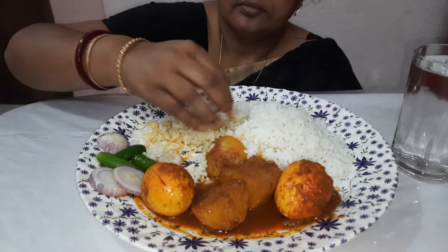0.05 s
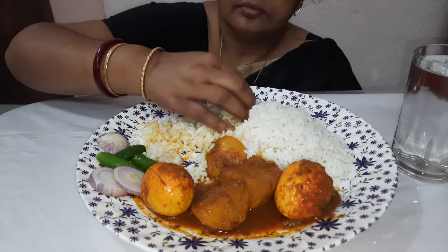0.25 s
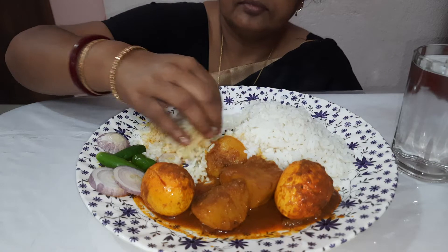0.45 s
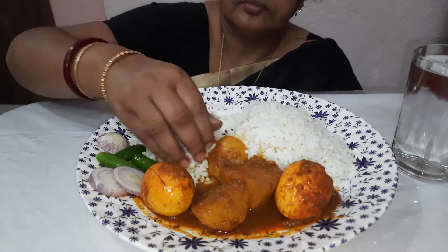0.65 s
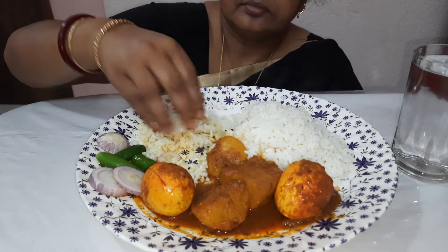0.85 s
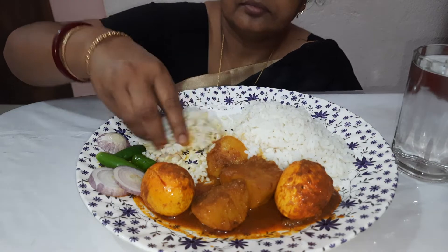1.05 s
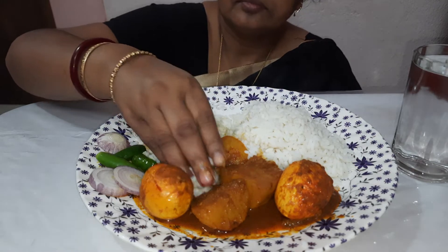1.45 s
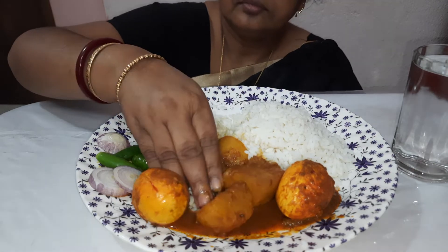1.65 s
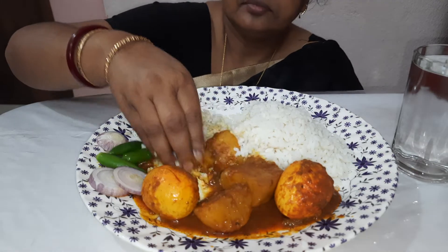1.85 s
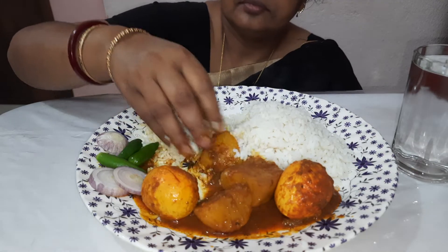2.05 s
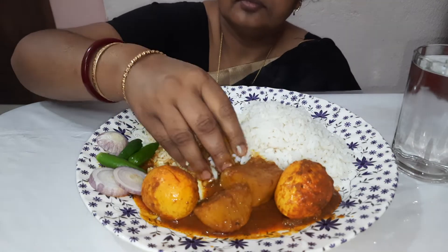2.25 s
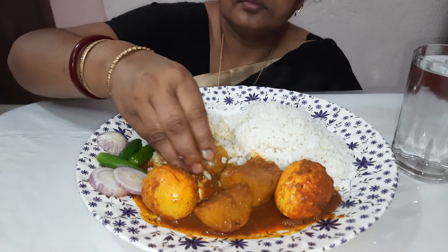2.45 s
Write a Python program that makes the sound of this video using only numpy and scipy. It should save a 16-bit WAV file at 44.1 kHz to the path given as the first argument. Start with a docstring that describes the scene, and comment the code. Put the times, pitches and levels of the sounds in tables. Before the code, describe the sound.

Something hard falls in a small room, clacking twice in quick succession and bouncing lightly. Afterwards come faint sticky ticks and soft thuds as fingers mix rice on a plate, with quiet room rumble and a thin insect trill behind.

```python
"""A hard object drops in a small, hard-walled room: a double clack and a weak rebound.
Each contact cracks, rings the object's modes and thumps the table; the room carries the decay.
Fingers work wet rice with tiny sticky ticks, rub the plate and bump it on the table.
Behind it: low room rumble, a faint far-off howl, a thin whine and an insect's trill."""
import sys
import numpy as np
from scipy import signal
from scipy.fft import rfft, irfft, next_fast_len
from scipy.io import wavfile
from scipy.ndimage import uniform_filter1d, map_coordinates

SR = 44100
rng = np.random.default_rng(int(sys.argv[2]) if len(sys.argv) > 2 else 0)


def unload_audio(sound):
    """Save the sound as a 16-bit wav file, at the path given as the first command line argument."""
    columns = np.transpose(np.atleast_2d(sound))
    # keep every value between -1 and 1, then stretch to whole-number steps
    steps = np.round(np.clip(columns, -1, 1) * 32767)
    wavfile.write(sys.argv[1], SR, steps.astype(np.int16))


N = 110250

# Room decay. Each row: frequency in Hz, T60 in seconds.
ROOM_T60 = [(300, 0.33), (1500, 0.37), (2800, 0.39), (4800, .29), (8000, .32), (14000, 0.28)]
# Diffuse sound. Each row: frequency in Hz, left-right correlation.
ROOM_COHERENCE = [(300, 0.79), (650, 0.18), (1400, 0.058), (3000, .05)]
# Room tone. Each row: frequency in Hz, relative level in dB.
ROOM_TONE_SPECTRUM = [(15, -69), (47, -14), (70, -2), (205, -6), (248, 0), (486, -17), (1120, -29),
                      (1820, -26.5), (3490, -33), (4250, -26), (5000, -38.5), (15800, -35.5)]
# Rumble fade. Each row: time in seconds, gain in dB.
RUMBLE_GAIN = [(0, -63.5), (0.75, -65.5), (0.95, -66), (1.3, -67), (2.5, -70.5)]
# One list per howl. Each row: time in seconds, pitch in Hz, level in dB.
HOWL_CONTOURS = [
    [(0.48, 422, -80), (0.56, 438.4, -63.5), (0.68, 426.6, -73), (0.8, 386.3, -70.5), (0.9, 335, -80)],
    [(1.14, 420.4, -80.5), (1.22, 460, -73), (1.3, 474, -73.5), (1.39, 437.7, -78), (1.44, 401, -79)],
]
# Whine and insect envelopes. Each row: time in seconds, level in dB.
WHINE_LEVEL = [(0.621, -102), (0.75, -80), (0.87, -102), (1.199, -102), (1.31, -85.5), (1.48, -79),
               (1.52, -84), (1.579, -75.5), (1.629, -89), (1.82, -84.5), (1.95, -108), (2.238, -98),
               (2.41, -84), (2.5, -90)]
INSECT_LEVEL = [(1.43, -99), (1.54, -75), (1.62, -71), (1.7, -73.5), (1.76, -72), (1.97, -72),
                (2.06, -79.5), (2.18, -85.5), (2.29, -75.5), (2.5, -78.5)]
# Insect rasp. Each row: frequency in Hz, relative level in dB.
RASP_SPECTRUM = [(3900, -37.5), (4250, -5.5), (4435, 1.5), (4750, -24.5), (5200, -73.5), (8000, -45.5),
                 (8850, -13), (9600, -51.5)]
# Fingers squeeze rice, rub the plate. Each row: centre in seconds, half length in seconds, level in dB.
RICE_SQUEEZES = [(1.17, .06, -77), (1.66, 0.029, -81), (1.84, 0.098, -81.5)]
PLATE_RUBS = [(1.25, 0.03, -78.5), (2.09, .02, -86), (2.148, 0.027, -74.5)]
# Sticky rice. Each row: start in seconds, gain in dB, band centre in Hz.
RICE_TICKS = [(1.1416, -56.5, 7930), (1.2126, -66, 10500), (1.6358, -66, 10200), (1.7615, -67, 7900),
              (1.799, -68, 12000), (1.8405, -66, 8000), (1.8986, -59, 2620)]
# Fingers bump the plate. Each row: start in seconds, thud gain in dB, tap gain in dB.
PLATE_BUMPS = [(0.0, -64.5, -86), (0.99, -54.5, -74), (1.972, -59.5, -100), (2.21, -63, -100)]
# Finger noises. Each row: frequency in Hz, relative level in dB.
SQUEEZE_SPECTRUM = [(3000, -15.5), (5500, -19), (8000, 0.5), (10000, -10), (12000, -6), (15500, -16)]
RUB_SPECTRUM = [(700, -7.5), (1080, 4), (1400, -12), (1900, -3), (6000, -51)]
THUD_SPECTRUM = [(24, -15), (40, -23.5), (103, 0), (250, -4.5), (408, -22.5), (1200, -100)]
TAP_SPECTRUM = [(700, -32), (1900, 9.5), (9000, -2), (15000, -31)]
# Drop contacts. Each row: start in seconds, crack, ring and thump gains in dB, factor on the room's T60.
DROP_CONTACTS = [(0.2340, -15, -33.5, -37, 0.54), (0.2441, -18, -34, -41, 1.0),
                 (0.3473, -44.5, -45.5, -48, 0.63)]
# Direct crack, diffuse ring and thump of the drop. Each row: frequency in Hz, relative level in dB.
CRACK_SPECTRUM = [(800, -42.5), (1080, -13), (1850, -15.5), (2240, -23), (2910, -1), (3530, -18.5),
                  (5000, -4.5), (5700, -30), (7100, -19), (7800, -6.5), (8200, -16), (8750, -0.5),
                  (9900, -24), (11700, -20.5), (15800, -44.5)]
RING_SPECTRUM = [(500, -56), (980, -22), (1150, -2), (1320, -11), (1450, -3), (1900, -6), (2290, -17),
                 (2850, -3.5), (3850, -14.5), (4150, -14.5), (4760, -12.5), (7040, -24.5), (7800, -15),
                 (10150, -28), (11200, -24), (15800, -48)]
THUMP_SPECTRUM = [(21, -66.5), (35, -35.5), (100, -2.5), (162, -9), (265, -2.5), (480, -16), (590, -14),
                  (820, -34.5), (940, -18), (1400, -100)]
# Modes of the object, and of table and room. Each row: frequency in Hz, relative level in dB.
OBJECT_MODES = [(1110, -64), (1195, -60), (1482, -51), (1793, -51.5), (1922, -56), (2509, -62),
                (2616, -55.5), (2815, -48.5), (2905, -56.5), (3012, -58), (3210, -53.5), (3321, -62.5),
                (3415, -59.5), (3716, -63.5), (3919, -57.5), (4608, -59), (4926, -65.5), (5028, -69),
                (8640, -67)]
BOOM_MODES = [(115, -61.5), (215, -61), (259, -60), (278, -58.5), (329, -56.5), (385, -61.5)]
# Stereo position of the crack. Each row: frequency in Hz, left over right in dB.
DROP_PAN = [(1300, 2), (2700, 5), (5000, -14), (8400, -9.5), (13000, 8.5)]


def amp(db):
    """Decibels to gain."""
    return 10 ** (np.asarray(db) / 20)


def unit(x):
    """Scale to rms 1."""
    return x / np.sqrt(np.mean(x ** 2) + 1e-20)


def clock():
    """Sample times in seconds."""
    return np.arange(N) / SR


def along(points, hz):
    """Interpolate (Hz, value) points on a log axis."""
    knots_hz, values = np.transpose(points)
    return np.interp(np.log(hz + 1), np.log(knots_hz + 1), values)


def curves(rows):
    """One value per sample for each column after the time."""
    times_s, *columns = np.transpose(rows)
    return [np.interp(clock(), times_s, column) for column in columns]


def wobble(knots_per_s):
    """Smooth random curve."""
    return map_coordinates(rng.standard_normal(4096), [clock() * knots_per_s], mode="wrap")


def filtered(x, response):
    """Apply a frequency response."""
    size = next_fast_len(N + SR // 2)
    return irfft(rfft(x, size) * response(np.fft.rfftfreq(size, 1 / SR)), size)[..., :N]


def sides(db):
    """Left and right gains for a level difference."""
    return amp(np.array([np.atleast_1d(db), -np.atleast_1d(db)]) / 2)


def noise(spectrum):
    """Coloured stereo noise of rms 1, nearly mono in the bass."""
    def mid_side_gains(hz):
        angle_rad = np.arccos(np.clip(along(ROOM_COHERENCE, hz), -1, 1)) / 2
        return amp(along(spectrum, hz)) * [np.cos(angle_rad), np.sin(angle_rad)]
    mid, side = filtered(rng.standard_normal((2, N)), mid_side_gains)
    return unit(np.array([mid + side, mid - side]))


def fall(time_s, t60_s):
    """Exponential decay gain."""
    return np.exp(-np.log(1000) * time_s / t60_s)


def struck(attack_s, t60_s):
    """Envelope of a blow at time zero."""
    return (1 - np.exp(-clock() / attack_s)) * fall(clock(), t60_s)


def at(start_s, x):
    """Delay a stereo signal."""
    return np.pad(x, ((0, 0), (max(round(start_s * SR), 0), 0)))[:, :N]


def room_tone(split_hz=700, swing_db=1.5, hiss_gain_db=-66.5):
    """Restless low rumble under a faint, even hiss."""
    gain_db, = curves(RUMBLE_GAIN)
    air = noise(ROOM_TONE_SPECTRUM)
    rumble = filtered(air, lambda hz: 1 / (1 + (hz / split_hz) ** 4))
    return amp(gain_db + swing_db * wobble(40)) * rumble + amp(hiss_gain_db) * (air - rumble)


def howls(blur_rad=.55, flutter_db=2):
    """Far-off arching tones; the walls leave only the blurred fundamental."""
    out = np.zeros(N)
    for contour in HOWL_CONTOURS:
        pitch_hz, level_db = curves(contour)
        sounding = (clock() > contour[0][0]) & (clock() < contour[-1][0])
        gate = uniform_filter1d(1. * sounding, size=2000)
        tone = unit(np.sin(2 * np.pi * np.cumsum(pitch_hz) / SR + blur_rad * wobble(55)))
        out += gate * amp(level_db + flutter_db * wobble(38)) * tone
    return out


def whine(pitch_hz=3770, blur_rad=.67, swell_db=2.5):
    """A thin tone that comes and goes in small swells."""
    level_db, = curves(WHINE_LEVEL)
    tone = unit(np.sin(2 * np.pi * pitch_hz * clock() + blur_rad * np.array([wobble(31), wobble(33)])))
    return amp(level_db + swell_db * wobble(28)) * tone


def insect(pitch_hz=4427, waver_hz=26, wavers_per_s=30, pulse_db=1.5, rasp_db=1):
    """A pulsing, wavering trill inside a narrow rasp with a weak octave."""
    level_db, = curves(INSECT_LEVEL)
    trill_hz = pitch_hz + waver_hz * wobble(wavers_per_s)
    trill = unit(np.sin(2 * np.pi * np.cumsum(trill_hz) / SR + .5 * np.array([wobble(40), wobble(57)])))
    envelope = amp(level_db + pulse_db * wobble(wavers_per_s))
    return envelope * unit(trill + amp(rasp_db) * noise(RASP_SPECTRUM))


def finger_friction(strokes, spectrum, grain_db):
    """Grainy friction that swells and fades with each stroke."""
    swell = sum(amp(level_db) * np.exp(-.5 * ((clock() - centre_s) / half_s) ** 2)
                for centre_s, half_s, level_db in strokes)
    return swell * unit(noise(spectrum) * amp(grain_db * wobble(900)))


def rice_ticks(width_oct=.15, trim_db=-1, pan_db=-10, echo_db=-3):
    """Wet grains part with tiny snaps, each with a wisp of room."""
    out = np.zeros((2, N))
    for start_s, gain_db, centre_hz in RICE_TICKS:
        band = lambda hz: np.exp(-.5 * (np.log2((hz + 1) / centre_hz) / width_oct) ** 2)
        snap = unit(filtered(rng.standard_normal(N), band)) * struck(attack_s=.0001, t60_s=.007)
        room = rng.standard_normal((2, N)) * fall(clock(), along(ROOM_T60, centre_hz))
        echo = signal.fftconvolve(snap[None, :1024], room / np.linalg.norm(room[0]), axes=1)[:, :N]
        out += at(start_s, amp(gain_db + trim_db) * (sides(pan_db) * snap + amp(echo_db) * echo))
    return out


def plate_bumps(table_hz=132, table_db=5, nail_db=19.5):
    """Fingers push the plate: the table thuds on its lowest mode, a nail clicks, the room answers."""
    nail_envelope = amp(nail_db) * struck(attack_s=.00048, t60_s=.0048)
    tap_envelope = nail_envelope + struck(attack_s=.00071, t60_s=.25)
    table = amp(table_db) * np.sin(2 * np.pi * table_hz * clock()) * struck(attack_s=.0042, t60_s=.19)
    out = np.zeros((2, N))
    for start_s, thud_db, tap_db in PLATE_BUMPS:
        thud = table + noise(THUD_SPECTRUM) * struck(attack_s=.0021, t60_s=.33)
        tap = noise(TAP_SPECTRUM) * tap_envelope
        out += at(start_s, amp(thud_db) * thud + amp(tap_db) * tap)
    return out


def room_decay(x, attack_s, t60_scale):
    """Fast rise, then each frequency dies at its own rate."""
    hz, times_s, bins = signal.stft(x, SR, nperseg=256)
    decay = fall(times_s, t60_scale * along(ROOM_T60, hz)[:, None])
    tail = signal.istft(bins * decay, SR, nperseg=256)[1][:, :N]
    return tail * (1 - np.exp(-clock() / attack_s))


def modes(rows, spread_rad, blur_rad=.62):
    """Sines of total rms 1; reflections make each phase wander and differ between the ears."""
    ring = np.zeros((2, N))
    for hz, level_db in rows:
        phase = 2 * np.pi * (hz * clock() + rng.random()) + blur_rad * wobble(35)
        ring += amp(level_db) * np.sin(phase + spread_rad * np.array([wobble(20), wobble(13)]))
    return unit(ring)


def contact_crack(burst_t60_s=.010, right_lag_s=.000347):
    """Direct sound of a contact: a short burst, whitened, coloured and panned."""
    def response(hz):
        lag = np.exp(-2j * np.pi * hz * right_lag_s * np.arange(2)[:, None])
        return amp(along(CRACK_SPECTRUM, hz)) * sides(along(DROP_PAN, hz)) * lag
    envelope = struck(attack_s=.0005, t60_s=burst_t60_s)
    bins = rfft(rng.standard_normal(N) * envelope, 2 * N)
    white = irfft(bins / (np.abs(bins) + 1e-12))[:N]
    crack = filtered(white, response) * fall(clock(), 10 * burst_t60_s)
    return unit(crack) * np.sqrt(np.mean(envelope ** 2))


def dropped_object(body_db=-2, boom_db=-1.5, push_hz=230, push_db=-10, ring_pan_share=.53):
    """Each contact gives a crack, a push as the surface yields, a ring and a low thump."""
    body = amp(body_db) * modes(OBJECT_MODES, spread_rad=1.3)
    boom = amp(boom_db) * modes(BOOM_MODES, spread_rad=.15)
    push = amp(push_db) * np.sin(2 * np.pi * push_hz * clock()) * struck(attack_s=.004, t60_s=.0095)
    ring_pan = lambda hz: sides(ring_pan_share * along(DROP_PAN, hz))  # the room evens out the sides
    out = np.zeros((2, N))
    for start_s, crack_db, ring_db, thump_db, t60_scale in DROP_CONTACTS:
        shift = -round(start_s * SR)  # later contacts feed the same vibration
        ring = filtered(noise(RING_SPECTRUM) + np.roll(body, shift, axis=1), ring_pan)
        ring = room_decay(ring, attack_s=.0006, t60_scale=t60_scale)
        thump = noise(THUMP_SPECTRUM) + np.roll(boom, shift, axis=1)
        thump = room_decay(thump, attack_s=.002, t60_scale=t60_scale)
        direct = contact_crack() + push
        out += at(start_s, amp(crack_db) * direct + amp(ring_db) * ring + amp(thump_db) * thump)
    return out


def scene():
    """Fingers, drop and background, in stereo."""
    fingers = plate_bumps() + rice_ticks()
    fingers += finger_friction(RICE_SQUEEZES, SQUEEZE_SPECTRUM, grain_db=5)
    fingers += finger_friction(PLATE_RUBS, RUB_SPECTRUM, grain_db=2.5)
    return fingers + dropped_object() + insect() + whine() + howls() + room_tone()


def record(dry):
    """Brick-wall low-pass at 15750 Hz."""
    return filtered(dry, lambda hz: hz < 15750)


dry = scene()
out = record(dry)
unload_audio(out)
```